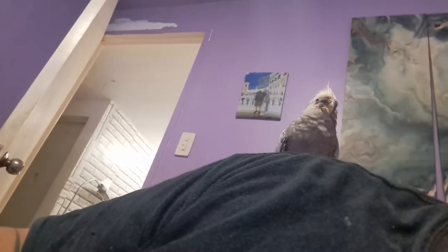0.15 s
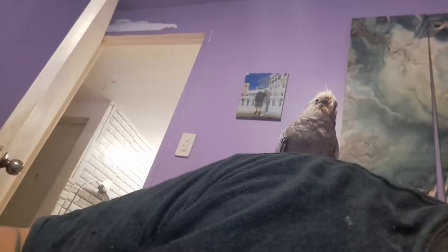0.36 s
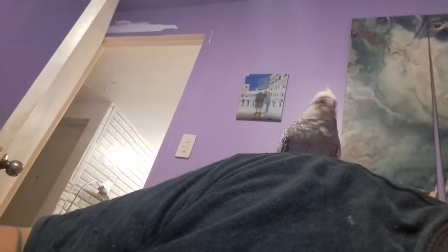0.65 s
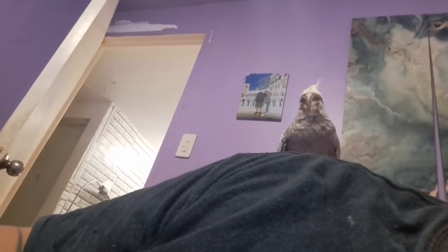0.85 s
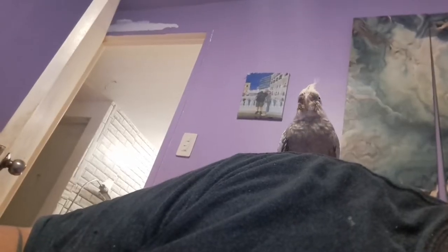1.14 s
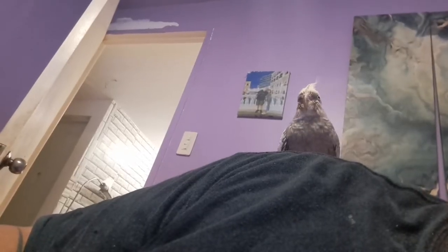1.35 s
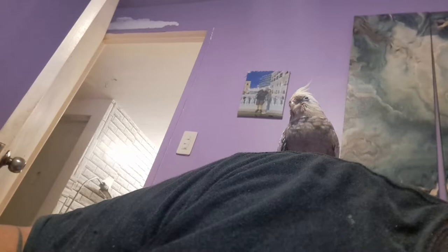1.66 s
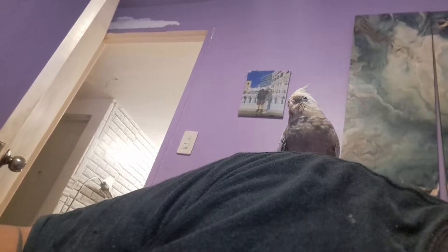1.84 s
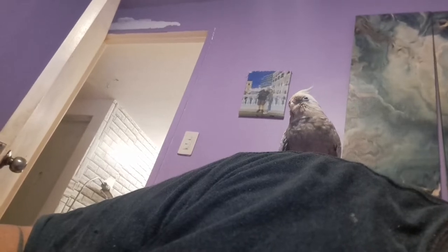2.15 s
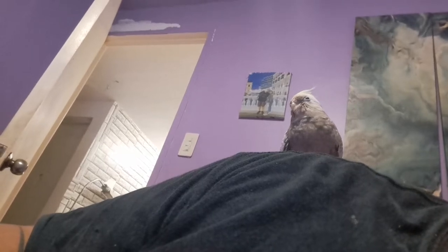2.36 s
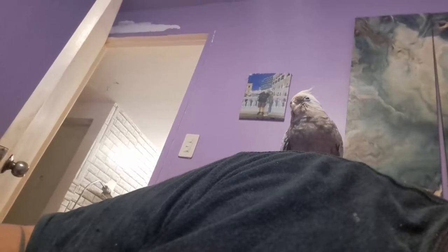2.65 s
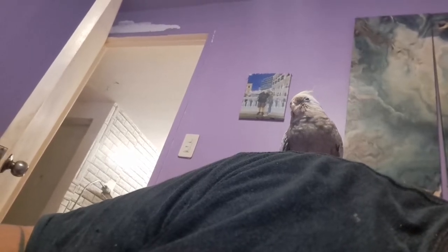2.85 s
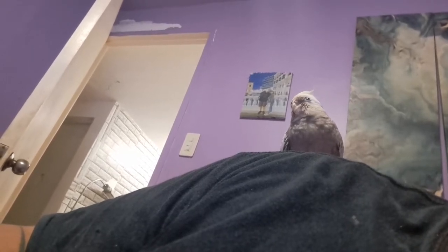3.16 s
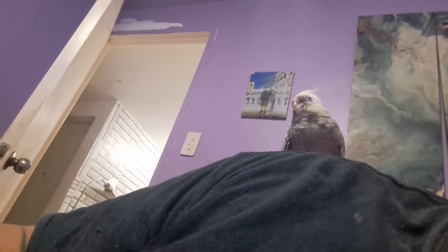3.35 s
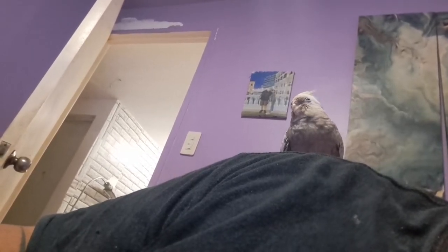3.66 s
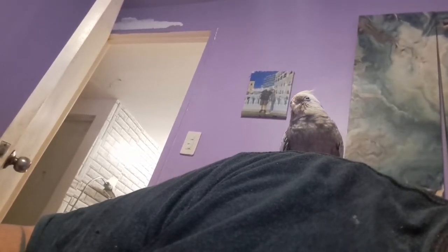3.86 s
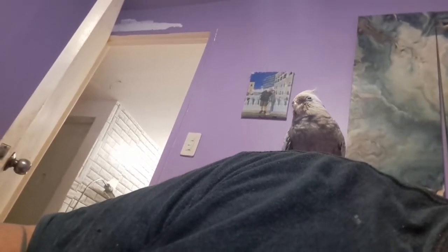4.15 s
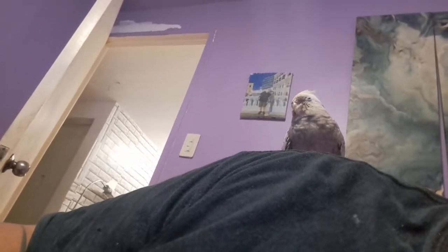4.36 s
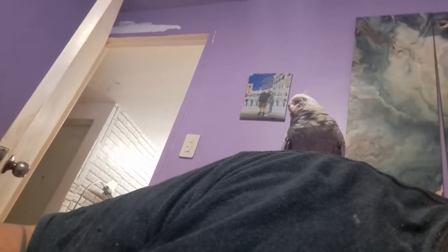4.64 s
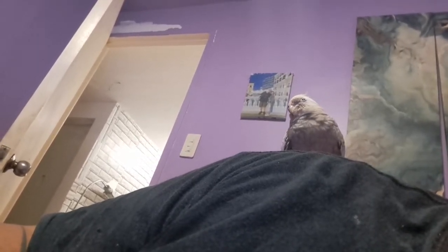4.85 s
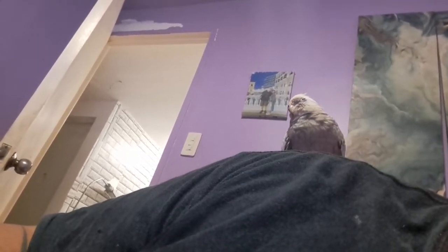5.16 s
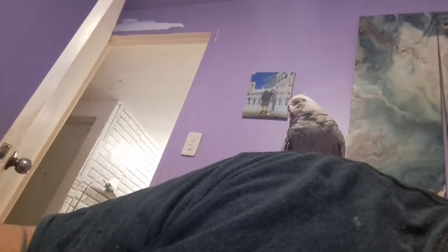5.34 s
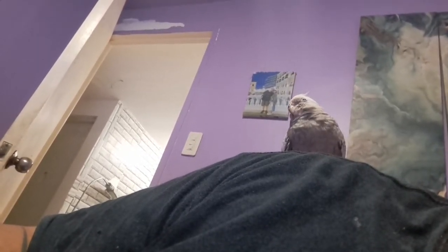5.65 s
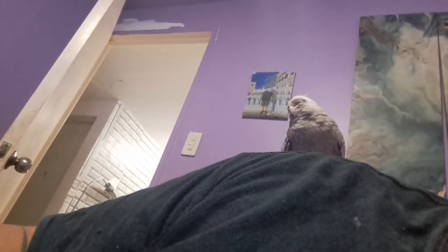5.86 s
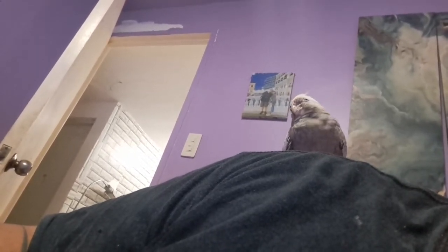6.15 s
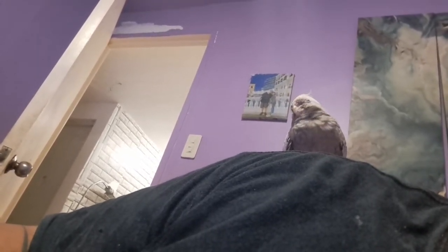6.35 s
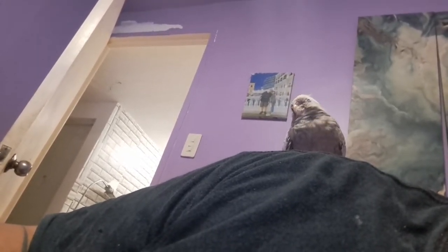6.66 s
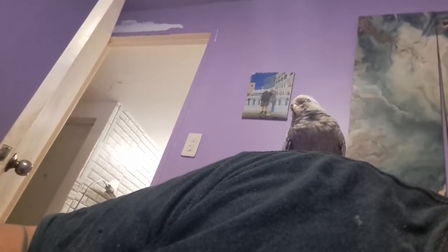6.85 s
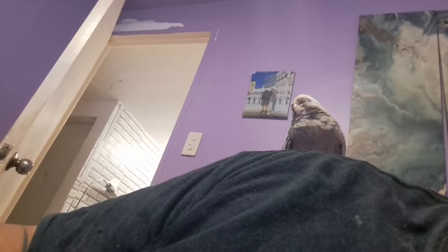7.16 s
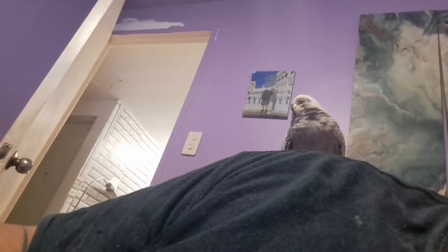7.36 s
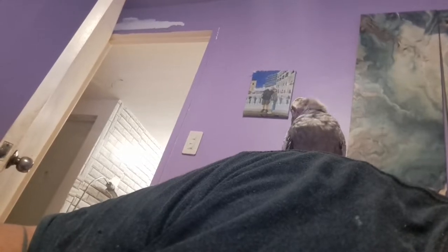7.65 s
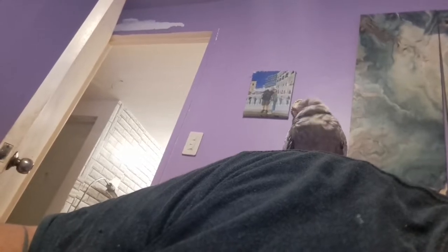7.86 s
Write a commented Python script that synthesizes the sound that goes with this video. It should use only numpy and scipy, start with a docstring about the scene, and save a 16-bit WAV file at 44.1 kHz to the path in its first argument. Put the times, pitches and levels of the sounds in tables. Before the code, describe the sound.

A quiet small bedroom with a fan's soft airy rush, faint hum and uneven low rumble throughout, swelling near 2.6 and 7.3 s. Dull bedding bumps touch the hand-held stereo microphone at about 0.1, 2.2 to 2.9, 5.5 and 7.2 s, with fainter ones between, and brief soft hisses pass. A cockatiel calls at moderate distance, walls ringing about half a second. At 0.6 s a sharp rasping squeak drops straight into a hollow, slightly rising hoot at 0.75. A faint whistle arches at 1.9. Squeaks burst at 2.4, then a hoot at 3.2, a clearer up-and-down whistle at 3.45 and a low weak croak at 3.6. Another harsh squeak cluster comes at 4.4, a strong hoot at 5.7, a shorter hoot at 6.15, a tiny knock-like cluck at 6.3, and squeaks at 6.5. From 7.1 only barely audible peeps remain, as the fan air grows slightly.

```python
"""A fan rushes, rumbles and hums; bedding bumps dully against a hand-held camera; soft hisses pass.
A cockatiel chatters in a small bedroom: rasping squeaks, hollow hoots, arched whistles, faint peeps,
a low croak and a short knock-like cluck. Fan, bumps and hisses are filtered noise, plus sines for the
hum. Calls are harmonic tones that fray into a rasp, with noise pulsed once a cycle.
The bare walls ring after each call."""
import sys
import numpy as np
from scipy import signal
from scipy.fft import rfft, irfft, next_fast_len
from scipy.io import wavfile
from scipy.ndimage import uniform_filter1d, minimum_filter1d, map_coordinates

SR = 44100
rng = np.random.default_rng(int(sys.argv[2]) if len(sys.argv) > 2 else 0)


def wrap_up_sound(samples):
    """Save the sound to the file named by the first command line argument, as 16-bit audio."""
    columns = np.atleast_2d(samples).T
    # keep every value between -1 and 1, then stretch to whole-number steps
    tamed = np.clip(columns, -1, 1)
    steps = np.round(tamed * 32767).astype(np.int16)
    wavfile.write(sys.argv[1], SR, steps)


N = 353020
TOP_HZ = 15750

# All levels are relative, ahead of the gains in the functions.
# Fan air spectrum: (frequency [Hz], gain [dB])
AIR_SPECTRUM = [(110, -27), (180, -13), (225, -8.5), (327, 0), (366, -2), (394, 0.5), (425, -1.5),
                (595, -10), (653, -8.5), (1060, -7), (1350, -7), (2600, -10), (3990, -18), (5700, -22.5),
                (15600, -36.5)]
# Fan housing resonances: (centre [Hz], width [Hz], peak gain [dB])
HOUSING_RESONANCES = [(390, 390, 1), (1064, 232, 9)]
# Rushing air over time: (time [s], level [dB]); near the end the bird's rustling swells it
AIR_LEVEL = [(0, -49), (6.9, -49), (7.7, -45.5), (8, -47)]
# Fan rumble spectrum: (frequency [Hz], gain [dB])
RUMBLE_SPECTRUM = [(12, -37), (20, -13.5), (59, -5.5), (128, -5.5), (166, -9.5), (203, -17), (231, -20),
                   (260, -7), (340, -36), (570, -120)]
# Rumble over time: (time [s], level [dB])
RUMBLE_CURVE = [(0.0, -60), (0.42, -51), (0.96, -59), (2.27, -54.5), (2.6, -43.5), (3.14, -60), (3.7, -53),
                (4.28, -69), (5.17, -57.5), (5.84, -64.5), (6.08, -51), (6.62, -61.5), (7.33, -46),
                (8.0, -52)]
# Hum tones: (frequency [Hz], level [dB])
HUM_TONES = [(63, -68), (196, -65), (328, -64.5), (392, -69)]
# Fan noise, likeness of left and right: (frequency [Hz], correlation [-1 to 1])
FAN_ALIKE = [(60, 0.031), (180, -0.34), (550, 0.82), (1650, 0.13), (4970, -0.083), (15000, -0.11)]
# Fan stereo balance: (frequency [Hz], left over right [dB])
FAN_LEAN = [(60, -24.5), (110, -17.5), (200, -10), (380, 2), (700, 0), (1290, -1.0), (2380, -2),
            (4400, -2.5), (8120, -1.5), (15000, -8)]
# Bedding bumps: (start [s], level [dB], length [s])
BEDDING_BUMPS = [(0.085, -26.5, 0.032), (1.352, -43, 0.054), (2.205, -32, 0.032), (2.351, -30, 0.055),
                 (2.712, -25.5, 0.065), (2.919, -37, 0.069), (3.965, -40, 0.072), (5.564, -34, .06),
                 (6.073, -42, 0.092), (6.644, -36.5, 0.034), (7.181, -31.5, 0.067)]
# Bump spectrum: (frequency [Hz], gain [dB])
BUMP_SPECTRUM = [(15, -41), (45, 4.5), (75, -2), (140, -1), (220, -14.5), (400, -16), (1200, -58),
                 (4000, -97)]
# Soft hisses: (start [s], length [s], level [dB])
HISS_TIMES = [(0.358, 0.15, -46), (1.878, 0.33, -52), (2.198, 0.14, -46.5), (3.234, 0.14, -59),
              (4.166, 0.12, -53.5), (6.215, 0.035, -45), (6.947, 0.1, -57)]
# Hiss spectrum: (frequency [Hz], gain [dB])
HISS_SPECTRUM = [(1500, -6), (3500, -3), (6500, -2.5), (8500, -16), (13000, -16), (15700, -28)]
# Squeaks; both sides of the syrinx can sound at once, so notes overlap:
# (start [s], length [s], rise [s], first pitch [Hz], last pitch [Hz], peak level [dB], fade [dB],
#  roughness [0-1], first brightness [dB/octave], last brightness [dB/octave])
SQUEAK_NOTES = [ (.58, 0.025, .004, 1860, 1764, -28, 3, 0.042, -7.5, -3.5),
                (.602, .05, .035, 5450, 5150, -22.5, 4.5, 0.95, -4, 5.5),
                (.606, .04, 0.013, 6195, 6265, -19, 5, 0.11, -16, 8),
                (.633, .072, 0.0097, 4825, 4036, -15.5, 4, 0.063, -2, -3.5),
                (2.389, .05, 0.016, 6280, 6070, -19, 17, 0.16, -21, 0),
                (2.392, 0.073, 0.035, 4380, 4537, -14, 14.5, 0.34, -1, 0),
                (2.418, 0.084, 0.012, 5170, 5096, -14, 15.5, 0.1, 2, -14),
                (2.438, 0.0904, 0.056, 3396, 3146, -26.5, 1.5, 0.36, -2, -3.5),
                (2.525, 0.056, 0.017, 3860, 3654, -20, 3, 0.022, -1, -16),
                (4.411, 0.04, 0.029, 4380, 4450, -27, 0, 0.081, 0, 8),
                (4.438, .036, .009, 4440, 4340, -16, 19, 0.071, 1.5, 8),
                (4.442, 0.13, 0.0048, 5580, 6170, -21.5, 15, 0.84, 0.5, -1),
                (4.467, 0.0915, 0.025, 4090, 3667, -21.5, 5, .12, -10, -8),
                (4.502, 0.071, 0.021, 3100, 2612, -28, 4.5, 0.61, -2, -9),
                (4.556, 0.0597, 0.025, 4207, 4636, -16, 5, 0.019, 10.5, -7),
                (6.463, .06, 0.015, 5134, 3800, -22.5, 8.5, 0.073, 5.5, -3.5),
                (6.548, 0.027, 0.017, 3850, 3884, -26.5, 4, 0.17, -13.5, 5)]
# Squeak throat resonance: (frequency [Hz], gain [dB])
SQUEAK_COLOUR = [(1700, -18), (2700, -5), (3600, -7), (4600, 13.5), (6400, -6), (7200, -6), (8600, -10.5),
                 (10000, -12), (11500, -5.5), (13200, -0.5), (14300, -17), (15700, -31)]
# Hoots: (start [s], length [s], rise [s], first pitch [Hz], last pitch [Hz], peak level [dB], fade [dB],
#  roughness [0-1], first brightness [dB/octave], last brightness [dB/octave], glide [s])
HOOT_NOTES = [ (0.737, 0.15, 0.03, 698.6, 805.3, -12, 6, 0.023, 0, -4.5, 0.0142),
              (3.2, 0.14, 0.037, 723, 799, -11.5, 2, 0.017, 0.5, -4.5, .013),
              (5.667, 0.15, 0.048, 715, 786.9, -10, 12.5, 0.0066, -2.5, -2, 0.0441),
              (6.122, .152, 0.015, 575.6, 704.6, -27, 1.5, 0.11, 0, 2.5, .2),
              (6.174, .028, .009, 633, 654, -14, 14, 0.037, -8, 3, .02)]
# Throat resonance of hoots, croak and cluck: (frequency [Hz], gain [dB])
HOOT_COLOUR = [(300, -24.5), (600, -0.5), (800, -3.5), (1450, 2), (1900, -13.5), (2400, -7.5), (2800, -2.5),
               (3350, -22.5), (4000, -25), (6000, -34.5), (13000, -34)]
# Arched whistles, faint peeps of nearly level pitch: (start [s], length [s], time to crest [s],
#  first pitch [Hz], crest pitch [Hz], last pitch [Hz], crest level [dB], roughness [0-1],
#  first brightness [dB/octave], last brightness [dB/octave])
WHISTLE_NOTES = [ (1.885, .255, .145, 1997, 2596, 2152, -34.5, 0.21, -27.5, -15),
                 (3.458, .278, .12, 1844, 2328, 1330, -21.5, 0.074, 1.5, -8.5),
                 (7.07, 0.052, 0.043, 1162, 1169, 1188, -42.5, 0.12, -24, -17),
                 (7.409, .13, 0.0583, 1400, 1497, 1450, -53, 0.1, -1, -11),
                 (7.689, 0.092, 0.065, 1285, 1341, 1320, -42.5, 0.31, -15, -14.5),
                 (7.92, 0.059, 0.029, 1350, 1398, 1293, -47.5, 0.38, 0, -9)]
# Whistle throat resonance: (frequency [Hz], gain [dB])
WHISTLE_COLOUR = [(1100, -24.5), (1800, -7.5), (2400, -4), (3200, 3), (4600, 4.5), (5700, -5),
                  (6600, -11.5), (7700, -18), (9500, -23), (11500, -29), (15500, -44)]
# A low croak, then a short knock-like cluck: columns as SQUEAK_NOTES
CROAK_AND_CLUCK = [(3.62, .09, 0.063, 600, 412.3, -29, 9.1, .2, -6, -27),
                   (6.317, .02, 0.0022, 639, 476, -28, 14, 0.49, -8, -13)]
# Wall reverberation: (frequency [Hz], 60 dB decay time [s])
WALL_T60 = [(300, 0.57), (800, 0.6), (2400, 0.57), (4500, 0.47), (8000, 0.39), (13000, 0.37)]
# Wall ring, likeness of left and right: (frequency [Hz], correlation [-1 to 1])
RING_ALIKE = [(300, 0.99), (800, 0.38), (1600, 0.026), (4000, 0.063)]


def amp(db):
    """Decibels to gain."""
    return 10 ** (np.asarray(db) / 20)


def unit(x):
    """x at rms 1."""
    return x / np.sqrt(np.mean(x ** 2) + 1e-20)


def along(points, hz):
    """(Hz, value) points read on a log axis."""
    f, v = np.transpose(points)
    return np.interp(np.log(hz + 1), np.log(f + 1), v)


def wobble(rate_hz, n):
    """Smooth random curve of n samples, rate_hz knots a second."""
    knots = rng.standard_normal(int(n * rate_hz / SR) + 4)
    return map_coordinates(knots, [np.arange(n) * rate_hz / SR])


def filtered(x, response):
    """x times a response of frequency."""
    n = x.shape[-1]
    m = next_fast_len(n + 8192)
    return irfft(rfft(x, m) * response(np.fft.rfftfreq(m, 1 / SR)), m)[..., :n]


def coloured(x, spectrum):
    """x through a (Hz, dB) spectrum, at rms 1."""
    return unit(filtered(x, lambda hz: amp(along(spectrum, hz))))


def pair(alike, n):
    """Two noises with a given likeness at each frequency, mixed from mid and side."""
    def mid_side_gains(hz):
        turn = np.arccos(np.clip(along(alike, hz), -1, 1)) / 2
        return np.array([np.cos(turn), np.sin(turn)])
    mid, side = filtered(rng.standard_normal((2, n)), mid_side_gains)
    return np.array([mid + side, mid - side])


def panned(x, lean_db):
    """x louder on the left by lean_db."""
    return x * amp(np.array([[lean_db], [-lean_db]]) / 2)


def add(track, start_s, x):
    """Mix x into the track from start_s on."""
    part = track[..., round(start_s * SR):][..., :x.shape[-1]]
    part += x[..., :part.shape[-1]]


def fan():
    """Air through a resonant housing, a low rumble and a slightly unsteady hum."""
    t = np.arange(N) / SR
    rumble_db = np.interp(t, *np.transpose(RUMBLE_CURVE))
    air_db = np.interp(t, *np.transpose(AIR_LEVEL))

    def housing(hz):
        return amp(sum(db / (1 + (2 * (hz - centre) / width) ** 2)
                       for centre, width, db in HOUSING_RESONANCES))

    air = amp(air_db + 4.0) * coloured(filtered(pair(FAN_ALIKE, N), housing), AIR_SPECTRUM)
    surge_db = rumble_db - 2.5 + 5.1 * wobble(13, N)
    rumble = amp(surge_db) * coloured(pair(FAN_ALIKE, N), RUMBLE_SPECTRUM)
    drone = np.zeros(N)
    for hz, db in HUM_TONES:
        phase = 2 * np.pi * hz * t + 1.05 * wobble(2.35, N)
        drone += amp(db) * np.sqrt(2) * np.sin(phase)
    # the hum follows half the rumble's slow swell in dB
    hum = amp(.5 * (rumble_db - rumble_db.mean())) * drone
    return filtered(air + rumble + hum, lambda hz: amp(np.outer([1, -1], along(FAN_LEAN, hz)) / 2))


def bedding():
    """Dull pushes on the camera's body, stronger at the right port: short low noise swells."""
    out = np.zeros((2, N))
    for start_s, db, length_s in BEDDING_BUMPS:
        n = int(length_s * SR)
        swell = np.hanning(n) * pair([(50, 0.19)], n)
        push = np.pad(swell, ((0, 0), (n, n)))  # room for the filter to spread
        bump = amp(db - 10.0) * panned(coloured(push, BUMP_SPECTRUM), -4.5)
        add(out, start_s - length_s, bump)
    return out


def bedroom(x, direct_db, wet_db, lean_db, wall_lean_db):
    """The straight path, which reaches the right port first, and the ring of the walls."""
    n = int(.7 * SR)
    hz, t, z = signal.stft(pair(RING_ALIKE, n), SR, nperseg=256)
    decay = amp(-60 * t / along(WALL_T60, hz)[:, None])
    tail = signal.istft(z * decay, SR, nperseg=256)[1][:, :n]
    tail *= np.clip(np.arange(n) / SR / 0.0013, 0, 1) / np.linalg.norm(tail[0])
    response = amp(wet_db) * panned(tail, wall_lean_db)
    response[[0, 1], [4, 0]] += amp(direct_db) * panned(1, lean_db)[:, 0]  # left 4 samples later
    return signal.fftconvolve(x[None], response, axes=1)


def hisses():
    """Soft hisses: coloured noise under a half-sine swell."""
    out = np.zeros((2, N))
    for start_s, length_s, db in HISS_TIMES:
        n = int(length_s * SR)
        swell = np.sin(np.pi * np.arange(n) / n)
        hiss = amp(db) * swell * coloured(rng.standard_normal(n), HISS_SPECTRUM)
        add(out, start_s, bedroom(hiss, direct_db=-9.0, wet_db=5.5, lean_db=-19.5, wall_lean_db=0.0))
    return out


def syrinx(controls, throat, jitter, flutter_hz, rasp_hz, air_db, even_db, fraying):
    """A harmonic tone whose partials fray into a rasp where the membranes beat irregularly."""
    pitch_hz, db, rough, bright = controls
    n = len(pitch_hz)
    t = np.arange(n) / SR
    rough = np.clip(rough, 0, 1)
    flutter = 1 + jitter * np.sqrt(rough) * wobble(flutter_hz, n)
    phase = 2 * np.pi * np.cumsum(pitch_hz * flutter) / SR
    k = np.arange(1, 7)[:, None]  # partial numbers
    # partials swell as they slide through a throat resonance; even_db sets the even ones apart
    sizes_db = along(throat, k * pitch_hz) + bright * np.log2(k) + even_db * (k % 2 == 0)
    sizes = amp(sizes_db) * (k * pitch_hz < TOP_HZ)
    sizes /= np.linalg.norm(sizes, axis=0)
    fray = np.array([wobble(rasp_hz, n) + 1j * wobble(rasp_hz, n) for _ in k])
    clean = (1 - rough) ** (k ** fraying)  # higher partials fray first
    envelope = np.sqrt(2 * clean) + np.sqrt(1 - clean) * fray
    voice = np.sum(sizes * np.real(envelope * np.exp(1j * k * phase)), 0)
    # turbulent air escapes once a cycle
    puffs = rng.standard_normal(n) * (1 + np.cos(phase))
    air = amp(air_db) * np.sqrt(rough) * coloured(puffs, throat)
    edges = np.clip(np.minimum(t, t[-1] - t) / .005, 0, 1)
    return edges * amp(db) * (voice + air)


def note(length_s, rise_s, first_hz, last_hz, peak_db, fade_db, rough, first_bright, last_bright,
         glide_s, swell_db, catch, onset_dull=0):
    """Pitch, level, roughness, brightness: a note catches with a rasp, swells, settles and fades.

    catch: life of the opening rasp as a share of the rise; onset_dull [dB/octave]: brightness
    lacking at the start.
    """
    t = np.arange(int(length_s * SR)) / SR
    settled = np.expm1(-t / glide_s) / np.expm1(-length_s / glide_s)
    pitch_hz = first_hz + (last_hz - first_hz) * settled
    swell = swell_db * np.clip(1 - t / rise_s, 0, 1) ** 1.52
    fade = fade_db * np.clip((t - rise_s) / max(length_s - rise_s, 1 / SR), 0, 1)
    rasp = rough + (1 - rough) * np.exp(-t / (catch * rise_s))
    bright = np.linspace(first_bright, last_bright, len(t)) - onset_dull * np.exp(-t / rise_s)
    return pitch_hz, peak_db - swell - fade, rasp, bright


def squeaks():
    """Rasping squeaks: high, short syrinx notes, some overlapping."""
    out = np.zeros((2, N))
    for start_s, *shape in SQUEAK_NOTES:
        controls = note(*shape, glide_s=.027, swell_db=13, catch=0.2)
        call = syrinx(controls, SQUEAK_COLOUR, jitter=0.0458, flutter_hz=495.0, rasp_hz=898,
                      air_db=-3.5, even_db=0.0, fraying=.2)
        add(out, start_s, bedroom(call, direct_db=-2.5, wet_db=0.5, lean_db=-5.5, wall_lean_db=-1.0))
    return out


def hoots():
    """Hollow hoots: low notes; the pipe-like throat favours the odd partials."""
    out = np.zeros((2, N))
    for start_s, *shape in HOOT_NOTES:
        controls = note(*shape, swell_db=25, catch=0.47, onset_dull=13.4)
        call = syrinx(controls, HOOT_COLOUR, jitter=.025, flutter_hz=200, rasp_hz=280,
                      air_db=-2.5, even_db=-10, fraying=.8)
        add(out, start_s, bedroom(call, direct_db=-6.5, wet_db=-5.5, lean_db=1.5, wall_lean_db=.3))
    return out


def arch(length_s, crest_s, first_hz, crest_hz, last_hz, crest_db, rough, first_bright, last_bright):
    """Controls as in note(): pitch eases through three points, level follows it, the end frays."""
    t = np.arange(int(length_s * SR)) / SR
    ease = np.cos(np.pi / 2 * np.interp(t, [0, crest_s, length_s], [0, 1, 2])) ** 2
    pitch_hz = crest_hz + (np.where(t < crest_s, first_hz, last_hz) - crest_hz) * ease
    octaves = np.log2(pitch_hz / crest_hz)
    attack_db = -10 * np.clip(1 - t / 0.018, 0, 1)
    db = crest_db + 11.5 * octaves + attack_db  # 11.5 dB lost per octave below the crest
    bright = np.linspace(first_bright, last_bright, len(t))
    return pitch_hz, db, rough + .28 * (t / length_s) ** 5.9, bright


def whistles():
    """Syrinx whistles that arch up and down, and faint peeps of nearly level pitch."""
    out = np.zeros((2, N))
    for start_s, *shape in WHISTLE_NOTES:
        call = syrinx(arch(*shape), WHISTLE_COLOUR, jitter=0.038, flutter_hz=600, rasp_hz=503,
                      air_db=-15.5, even_db=3.0, fraying=1.8)
        add(out, start_s, bedroom(call, direct_db=-1.5, wet_db=0.5, lean_db=-6.0, wall_lean_db=-2.0))
    return out


def croak_and_cluck():
    """A low croak and a short knock-like cluck, made as hoots are but with more jitter."""
    out = np.zeros((2, N))
    for start_s, *shape in CROAK_AND_CLUCK:
        controls = note(*shape, glide_s=0.0251, swell_db=12, catch=0.42)
        call = syrinx(controls, HOOT_COLOUR, jitter=0.081, flutter_hz=196, rasp_hz=279,
                      air_db=-1.0, even_db=-10, fraying=.8)
        add(out, start_s, bedroom(call, direct_db=-6, wet_db=-9.0, lean_db=2.0, wall_lean_db=-2.0))
    return out


def scene():
    """Fan, bedding and hisses with the bird's calls."""
    return fan() + bedding() + hisses() + squeaks() + hoots() + whistles() + croak_and_cluck()


def record(dry):
    """The camera's limiter holds down the loudest peaks; nothing is kept above its band limit."""
    needed = 1 / np.maximum(1, np.abs(dry).max(0) / .8)
    gain = uniform_filter1d(minimum_filter1d(needed, size=441), size=441)  # 10 ms windows
    return filtered(dry * gain, lambda hz: hz < TOP_HZ)


dry = scene()
out = record(dry)
wrap_up_sound(out)
```